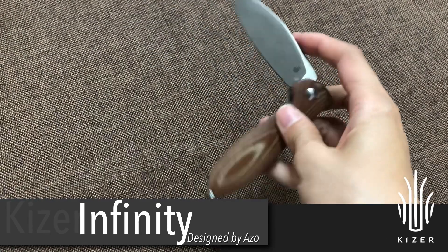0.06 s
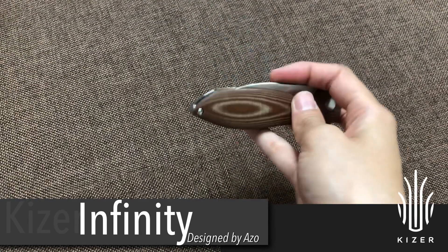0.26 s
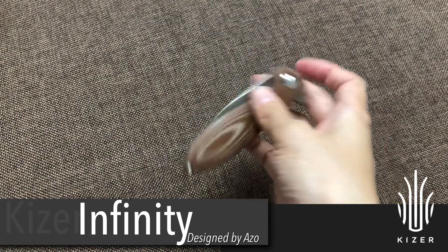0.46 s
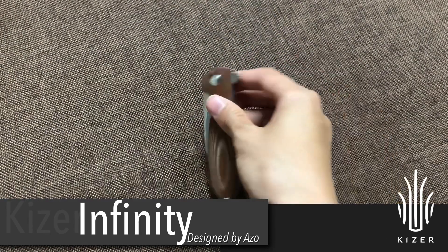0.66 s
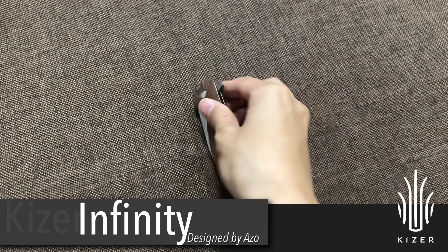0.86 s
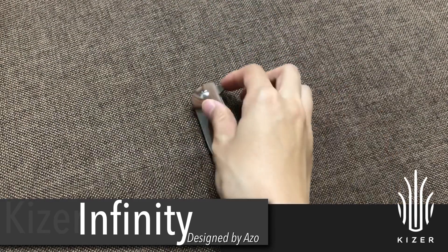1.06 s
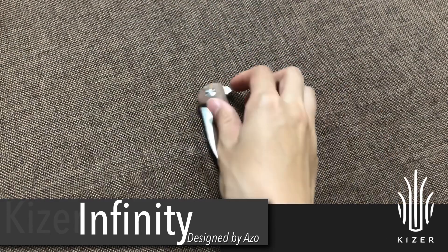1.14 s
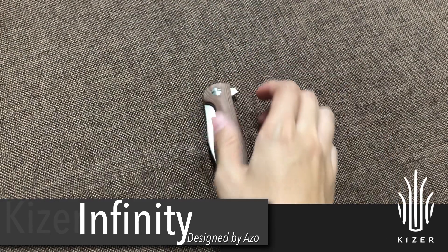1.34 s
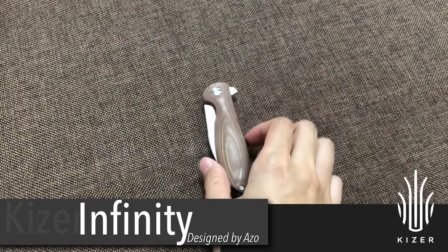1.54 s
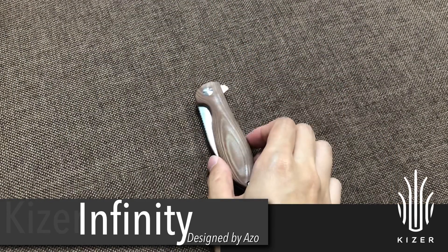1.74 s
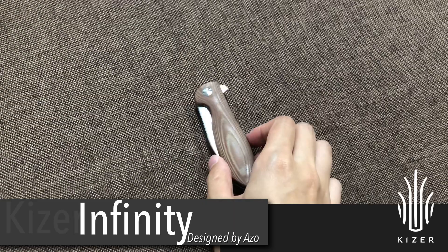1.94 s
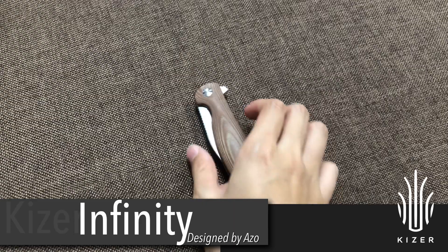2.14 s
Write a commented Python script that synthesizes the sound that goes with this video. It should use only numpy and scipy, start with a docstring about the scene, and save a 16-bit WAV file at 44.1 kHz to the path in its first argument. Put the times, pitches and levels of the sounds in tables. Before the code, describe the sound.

A folding knife blade swishes faintly and snaps with a sharp, briefly ringing metallic crack at 0.2 seconds. At 0.6 seconds the knife is set on a cloth-covered table with a dull knock and light ticks. It tips over with a softer knock near 0.9 seconds. Fingers rub faintly until 1.5 seconds, and a very soft bump comes at 1.8. It is close, over faint room rumble and hiss.

```python
"""A folding knife is worked in one hand, close by, in a small room with faint rumble, hiss and hum.
The blade swishes round its pivot, then at 0.23 s cracks against its stop, rebounds and rings.
At 0.63 s the knife is put down on a cloth-covered table: a dull knock, and the top rings.
At 0.94 s it tips onto its side and rocks briefly. A finger stills the table, the fingers
slide off, and the hand gives a last soft bump at 1.8 s."""
import sys
import numpy as np
from scipy import signal
from scipy.fft import irfft
from scipy.io import wavfile

SR = 44100
rng = np.random.default_rng(int(sys.argv[2]) if len(sys.argv) > 2 else 0)


def transcribe(u):
    """Save the signal u as a 16-bit wav file named by the first command-line argument.

    u: samples, shape (n,) or (channels, n), limited to [-1, 1]; the rate is SR.
    q: integer samples, one column per channel.
    """
    v = np.clip(np.atleast_2d(u).T, -1, 1)
    q = np.round(v * 32767).astype(np.int16)
    wavfile.write(sys.argv[1], SR, q)


N = 97020
TIME_S = np.arange(N) / SR
FREQ_HZ = np.maximum(np.fft.rfftfreq(N, 1 / SR), 1)

# Blade strike and rebounds. Each row: start in seconds, level in dB, contact time in seconds.
BLADE_CONTACTS = [(0.2260, 1.5, 0.0019), (0.2339, -2.5, 0.00076), (0.236, -10.5, .0002),
                  (0.2394, -18, .0014)]
# Steel crack. Each row: frequency in Hz, relative density in dB.
CRACK_SPECTRUM = [(150, -39.5), (600, -26.5), (1050, -17.5), (1500, -27.5), (2200, -19.5), (3100, -22),
                  (4500, -13), (6000, -10.5), (7500, -5.5), (10500, -0.5), (13200, -5), (14500, -8.5),
                  (15600, -3)]
# Ring of blade and liners. Each row: frequency in Hz, relative level in dB, t60 in seconds.
STEEL_MODES = [(1102, -32.5, .022), (1807, -35, .025), (2260, -35.5, 0.032), (3120, -36.5, 0.034),
               (4045, -35, 0.038), (5123, -22, 0.034), (6800, -27.5, .018), (7400, -22.5, 0.025),
               (7982, -25, .015), (8740, -15, .05), (9496, -20, 0.012), (11280, -13, .022),
               (12820, -21, .022), (13970, -24.5, 0.01466), (14520, -24.5, .014)]
# Knife meeting the table. Each row: start in seconds, level in dB, low-pass cut-off in Hz.
TABLE_CONTACTS = [(0.6290, 0.5, 1622), (0.77, -42, 900), (0.81, -36, 505), (0.9400, -14.5, 390)]
# Ring of the table top. Each row: frequency in Hz, relative level in dB, t60 in seconds.
TABLE_MODES = [(127.3, -39.7, 0.81), (167, -30.5, 1.21), (200.1, -23.5, 0.36), (248, -19.5, 0.058),
               (329.7, -17.5, 0.04), (338.6, -28.5, 0.5), (385.4, -18.5, 0.067), (489.7, -19.5, 0.13),
               (526.6, -10.5, 0.053), (535, -27.5, 0.46), (589, -25.5, 0.301), (708, -23.0, 0.1),
               (792, -31.5, 0.29), (858, -24, 0.28), (923, -15, 0.055), (886, -27.5, 0.45),
               (1020, -21.5, 0.041), (1092, -37.5, 0.4), (1152, -32.5, 0.24), (1363, -54, 0.66)]
# Quickly damped table modes. Each row: frequency in Hz, relative density in dB.
THUD_SPECTRUM = [(50, -31), (130, -29), (190, 3), (420, -1.5), (520, 4), (760, -7.5), (890, -2),
                 (1150, -4.5), (1300, -18.5), (1700, -18.5), (2500, -25.5), (5000, -36)]
# Hand on the table. Each row: start in seconds, frequency in Hz, level in dB, t60 in seconds.
HAND_BUMPS = [(0.639, 95, -34, 0.13), (0.945, 81.4, -39.5, 0.14), (1.003, 54.3, -41.5, 0.22),
              (1.797, 58, -40.5, .12)]
# Light contacts. Each row: start in seconds, level in dB, centre in Hz, t60 in seconds.
LIGHT_TICKS = [(0.2025, -45.5, 10000, 0.039), (0.498, -56, 11000, .09), (0.6280, -34.5, 9800, 0.004),
               (0.6291, -33, 3370, 0.012), (0.6834, -44, 10600, .012), (0.734, -54, 3600, .02),
               (0.7564, -56.5, 10500, 0.013), (0.7668, -43, 2020, 0.026), (0.7690, -61, 9000, 0.008),
               (0.8124, -53, 3370, 0.018), (0.8984, -50, 5500, 0.027), (0.918, -54, 14000, 0.11)]
# Swish of the turning blade. Each row: time in seconds, level in dB.
PIVOT_ENVELOPE = [(0, -58.5), (0.07, -59.5), (0.12, -57), (0.17, -52), (0.22, -57), (0.25, -81.5)]
# Pivot resonances. Each row: centre in Hz, width in Hz, relative level in dB,
# peak time in seconds, spread in seconds.
PIVOT_RESONANCES = [(1800, 160, -7.5, 0.108, 0.088), (3000, 210, -12, 0.078, .05),
                    (3950, 490, -7.5, .155, .035), (7000, 1600, -4.5, 0.19, 0.053),
                    (10400, 320, -5, .05, .06), (12850, 500, -4.5, .14, .08)]
# Skin rub. Each row: time in seconds, level in dB.
RUB_ENVELOPE = [(0, -66), (0.45, -65.5), (0.58, -57.5), (0.66, -59.5), (0.8, -59.5), (0.97, -60.5),
                (1.04, -68), (1.18, -66), (1.3, -58.5), (1.43, -61.5), (1.56, -74), (2.2, -68.5)]
# Skin rub. Each row: frequency in Hz, relative density in dB.
RUB_SPECTRUM = [(200, -1), (600, -4), (1200, 4.5), (2000, -1), (3200, -1), (6000, -5), (10000, -8),
                (15500, -15)]
# Reverberation. Each row: low edge in Hz, high edge in Hz (capped at 0.45 SR),
# gain in dB, t60 in seconds.
ROOM_BANDS = [(197.4, 1500, -11.5, .4), (1838, 4300, -10.5, .5), (4200, 7700, -11, 0.39),
              (8500, 48000, -16.5, .32)]
# Room rumble and hiss. Each row: frequency in Hz, relative density in dB.
FLOOR_SPECTRUM = [(15, -37.5), (25, -6), (49, -1), (62, -4), (86, -10.5), (178, -7.5), (349, -14),
                  (389, -20), (457, -16), (582, -21.5), (919, -26), (1110, -28), (1240, -31), (2120, -36),
                  (15500, -42.5)]

ROOM_DELAY_S = ROOM_RISE_S = .009


def blade_snap(attack_s=.0006, crack_db=-3, crack_t60_s=.011):
    """Each contact with the stop cracks while it lasts and adds to the steel's ring; returns both."""
    crack_envelope = 0
    for start_s, db, contact_s in BLADE_CONTACTS:
        rise = np.clip((TIME_S - start_s) / attack_s, 0, 1)
        fall = decay(start_s + attack_s + contact_s, crack_t60_s)
        crack_envelope += from_db(crack_db + db) * rise * fall
    crack = crack_envelope * noise(colour(CRACK_SPECTRUM))
    steel = 0
    for hz, mode_db, t60_s in STEEL_MODES:
        envelope = sum(from_db(db + mode_db) * blow(start_s, attack_s, t60_s)
                       for start_s, db, _ in BLADE_CONTACTS)
        steel += envelope * np.sin(2 * np.pi * (hz * TIME_S + rng.random()))
    return crack, steel


def table_knocks(attack_s=.0028, thud_db=-14.5, boom_db=-29):
    """Each knock thuds, rings the table and booms in the room; the cloth dulls the contact."""
    thud_noise = noise(colour(THUD_SPECTRUM))
    boom_noise = noise(colour(THUD_SPECTRUM))
    knocks = 0
    for start_s, db, cutoff_hz in TABLE_CONTACTS:
        top = ring(TABLE_MODES, start_s, attack_s)
        thud = from_db(thud_db) * thud_noise * blow(start_s, attack_s, t60_s=.03)
        boom = from_db(boom_db) * boom_noise * blow(start_s, ROOM_RISE_S, t60_s=.64)
        cloth = signal.butter(2, cutoff_hz, fs=SR, output="sos")
        knocks += from_db(db) * signal.sosfilt(cloth, top + thud + boom + 1e-18)
    finger_damping = decay(start_s=1.06, t60_s=.16)
    return knocks * finger_damping


def handle_rocking(hz=325.8, db=-28, t60_s=.086):
    """The settling handle makes one table mode swell and die."""
    return ring([(hz, db, t60_s)], start_s=.954, attack_s=.024)


def hand_bumps():
    """The hand's weight on the table gives a few slow cycles of bass."""
    return sum(ring([(hz, db, t60_s)], start_s, attack_s=.0042) for start_s, hz, db, t60_s in HAND_BUMPS)


def light_ticks(width_oct=.23, skirt_db=-14, attack_s=.00078):
    """Pocket clip, blade and fingernails tick: noise bursts, each round one broad resonance."""
    ticks = 0
    for start_s, db, centre_hz, t60_s in LIGHT_TICKS:
        hump = np.exp(-.5 * (np.log2(FREQ_HZ / centre_hz) / width_oct) ** 2)
        ticks += from_db(db) * blow(start_s, attack_s, t60_s) * noise(skirt_db * (1 - hump))
    return ticks


def pivot_swish(hiss_db=-6.5):
    """Pivot friction hisses and excites thin metallic resonances in turn."""
    swish = from_db(hiss_db) * rng.standard_normal(N)
    for centre_hz, width_hz, db, peak_s, spread_s in PIVOT_RESONANCES:
        whistle = noise(-20 * np.log10(1 + (2 * (FREQ_HZ - centre_hz) / width_hz) ** 2))
        swell = np.exp(-.5 * ((TIME_S - peak_s) / spread_s) ** 2)
        swish += from_db(db) * swell * whistle
    return gain_curve(PIVOT_ENVELOPE) * swish


def finger_rub():
    """Skin rubs on handle and cloth."""
    return gain_curve(RUB_ENVELOPE) * noise(colour(RUB_SPECTRUM))


def room_reverb(source):
    """Diffuse reflections; the top band dies first."""
    response = 0
    for low_hz, high_hz, db, t60_s in ROOM_BANDS:
        tail = rng.standard_normal(N) * blow(ROOM_DELAY_S, ROOM_RISE_S, t60_s)
        band = signal.butter(2, [low_hz, min(high_hz, .45 * SR)], "band", fs=SR, output="sos")
        response += from_db(db) * signal.sosfilt(band, tail / np.linalg.norm(tail))
    return signal.fftconvolve(source, response)[:N]


def background(floor_db=-50, hum_hz=52.5, hum_db=-64):
    """Room rumble, hiss and a faint low hum."""
    hum = from_db(hum_db) * np.sin(2 * np.pi * hum_hz * TIME_S)
    return from_db(floor_db) * noise(colour(FLOOR_SPECTRUM)) + hum


def from_db(db):
    """Decibels to gain."""
    return 10 ** (np.asarray(db) / 20)


def noise(spectrum_db):
    """Noise of rms 1 with the given spectral shape."""
    phases = np.exp(2j * np.pi * rng.random(len(FREQ_HZ)))
    wave = irfft(from_db(spectrum_db) * phases, N)
    return wave / wave.std()


def colour(points):
    """Spectrum in dB, interpolated over log frequency."""
    hz, db = np.transpose(points)
    return np.interp(np.log(FREQ_HZ), np.log(hz), db)


def gain_curve(points):
    """Gain over time, interpolated in dB."""
    return from_db(np.interp(TIME_S, *np.transpose(points)))


def decay(start_s, t60_s):
    """Unity until the start, then an exponential fall."""
    return from_db(-60 * np.clip((TIME_S - start_s) / t60_s, 0, 4))


def blow(start_s, attack_s, t60_s):
    """Linear rise, then exponential decay."""
    return np.clip((TIME_S - start_s) / attack_s, 0, 1) * decay(start_s + attack_s, t60_s)


def ring(modes, start_s, attack_s):
    """Decaying sines started together, alternating in sign."""
    ringing = 0
    for k, (hz, db, t60_s) in enumerate(modes):
        tone = np.sin(2 * np.pi * hz * (TIME_S - start_s))
        ringing += (-1) ** k * from_db(db) * blow(start_s, attack_s, t60_s) * tone
    return ringing


def scene(steel_send_db=-4.5):
    """Knife, table and hand, mono; the steel's ring reaches the room more weakly than the crack."""
    crack, steel = blade_snap()
    clicks = crack + light_ticks()
    knife = clicks + steel + room_reverb(clicks + from_db(steel_send_db) * steel)
    table = table_knocks() + handle_rocking() + hand_bumps()
    return (knife + table + pivot_swish() + finger_rub() + background())[None]


def record(dry):
    """The microphone loses the deepest bass, the snap overloads it, the top is cut."""
    low_cut_hz, top_cut_hz, overload_limit = 42, 15700, 1.6
    low_cut = signal.butter(4, low_cut_hz, "high", fs=SR, output="sos")
    top_cut = signal.ellip(10, .1, 70, top_cut_hz, fs=SR, output="sos")
    clipped = np.clip(signal.sosfilt(low_cut, dry), -overload_limit, overload_limit)
    return signal.sosfilt(top_cut, clipped)


dry = scene()
out = record(dry)
transcribe(out)
```